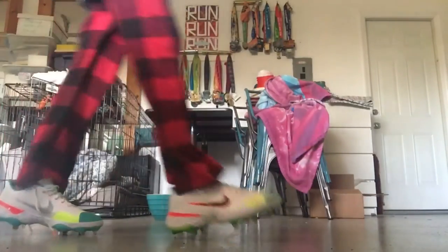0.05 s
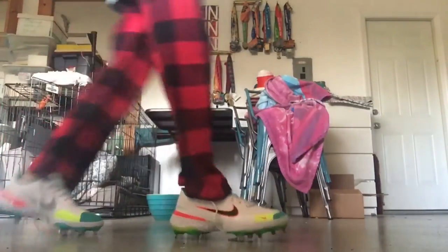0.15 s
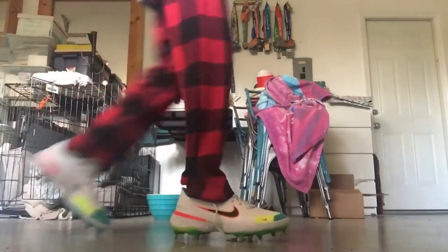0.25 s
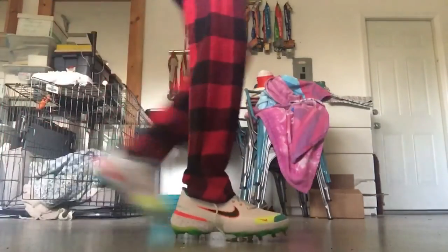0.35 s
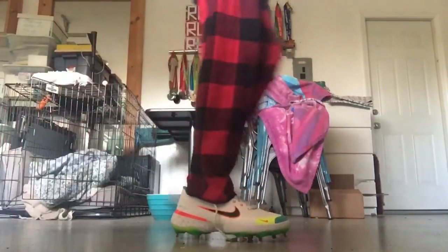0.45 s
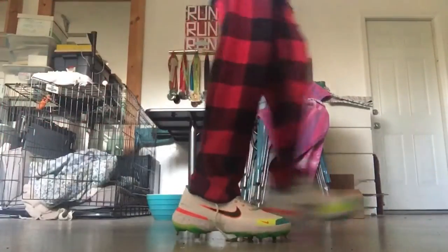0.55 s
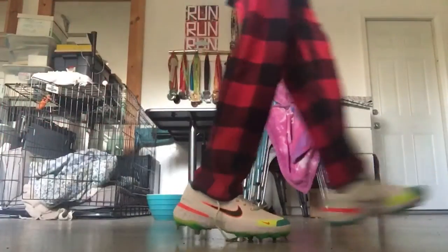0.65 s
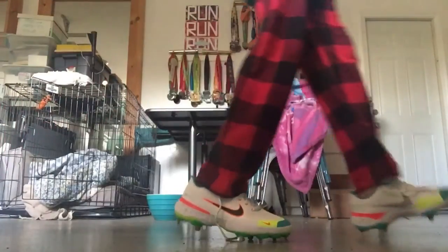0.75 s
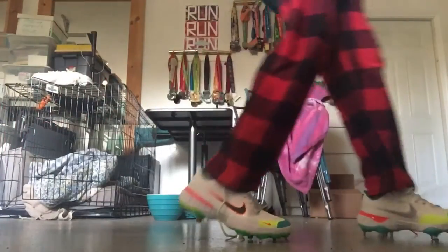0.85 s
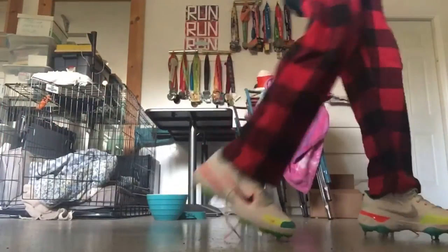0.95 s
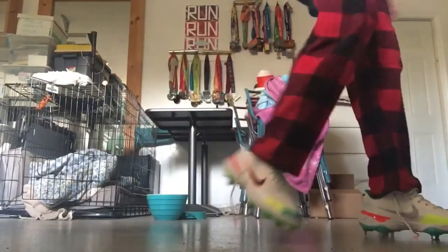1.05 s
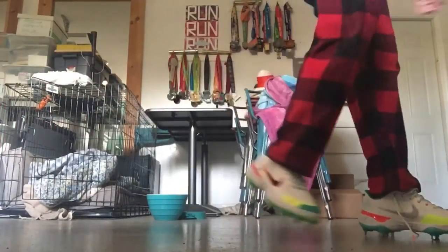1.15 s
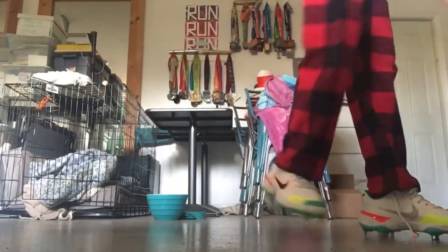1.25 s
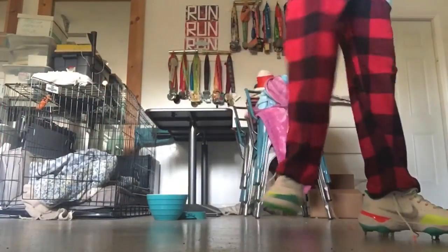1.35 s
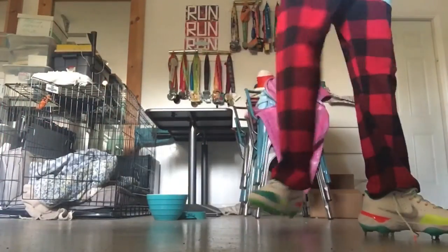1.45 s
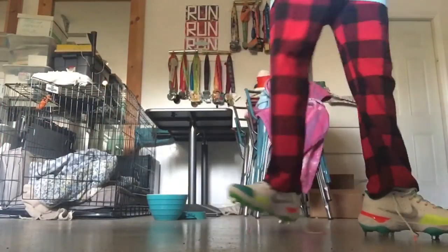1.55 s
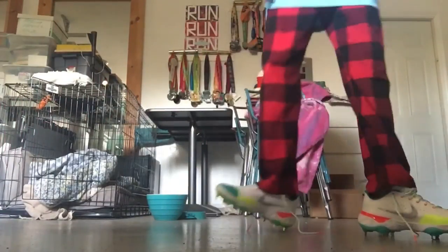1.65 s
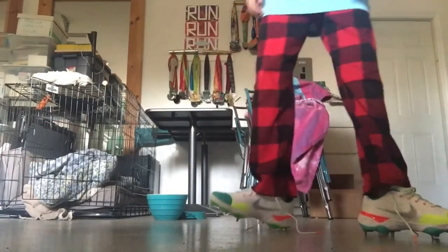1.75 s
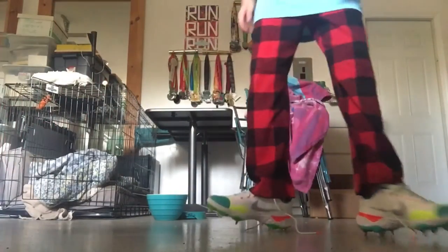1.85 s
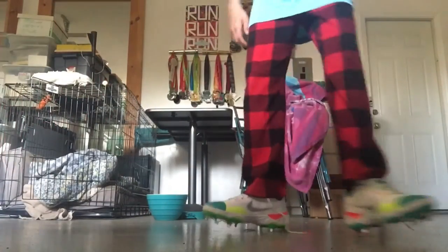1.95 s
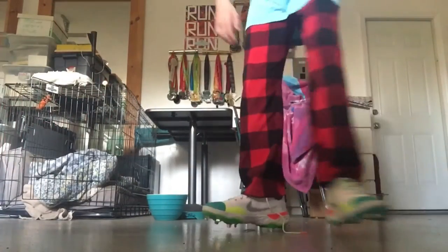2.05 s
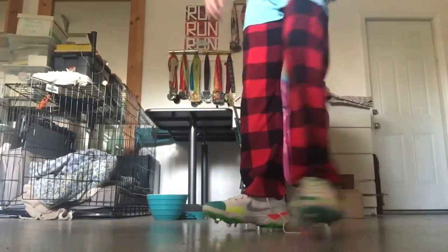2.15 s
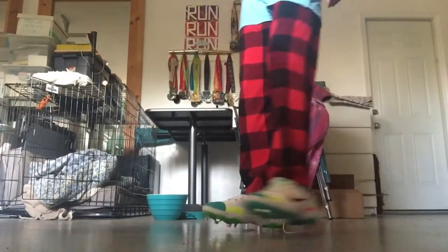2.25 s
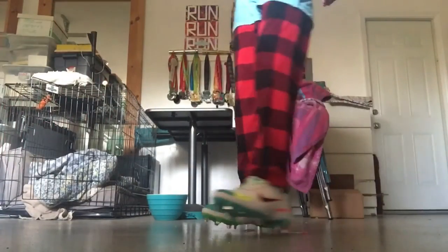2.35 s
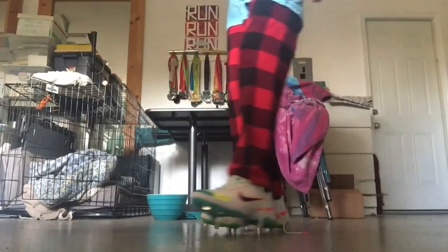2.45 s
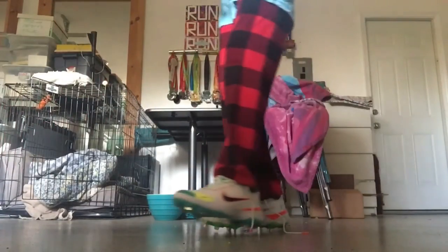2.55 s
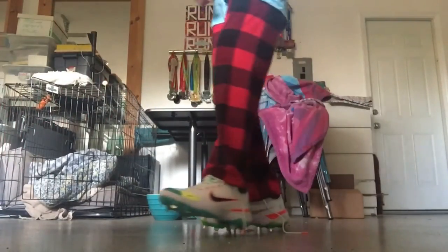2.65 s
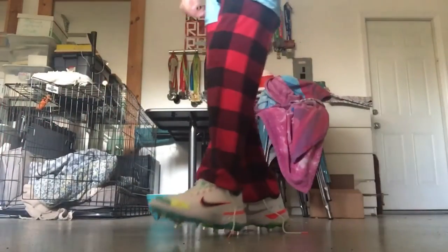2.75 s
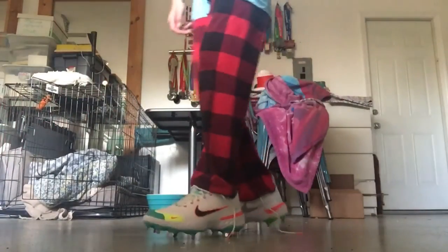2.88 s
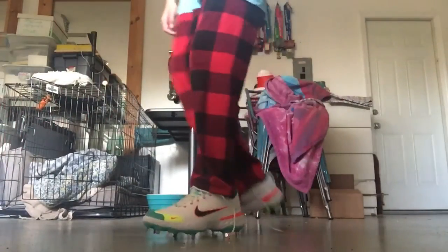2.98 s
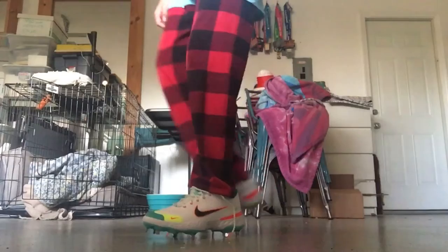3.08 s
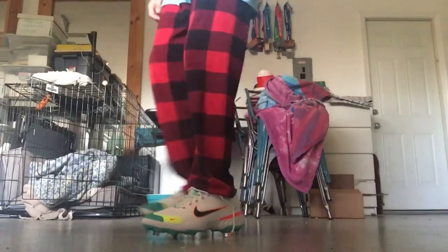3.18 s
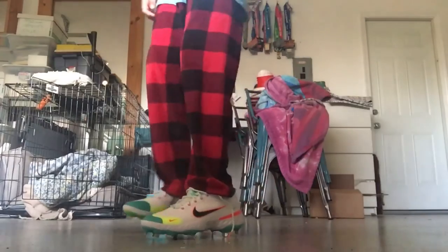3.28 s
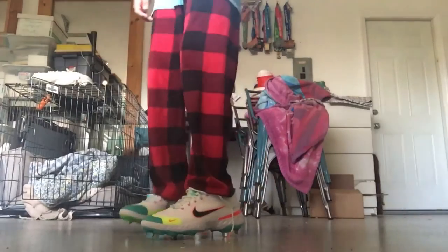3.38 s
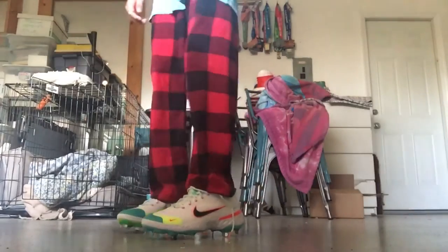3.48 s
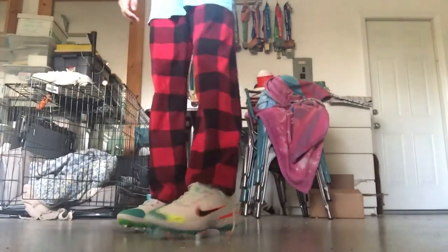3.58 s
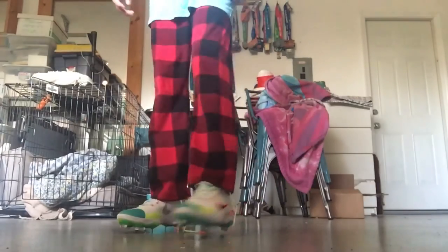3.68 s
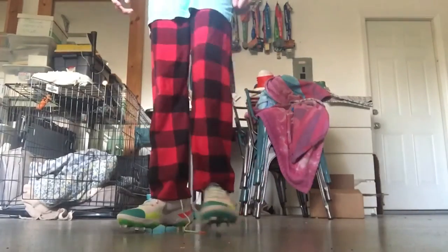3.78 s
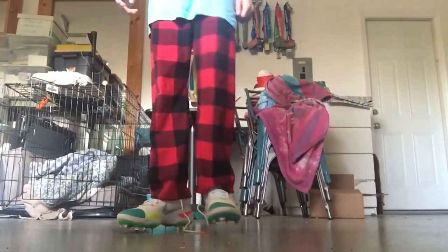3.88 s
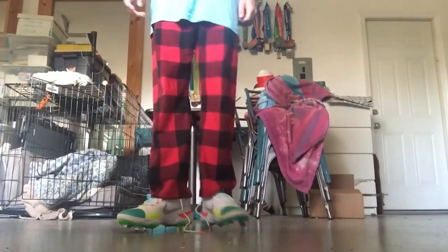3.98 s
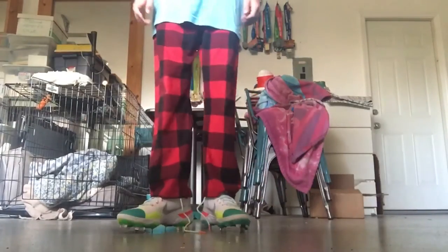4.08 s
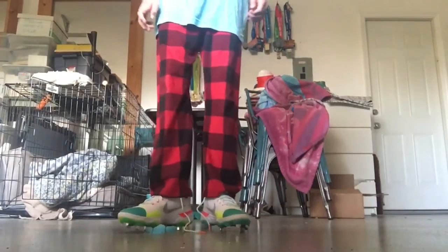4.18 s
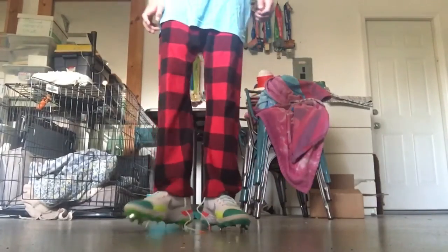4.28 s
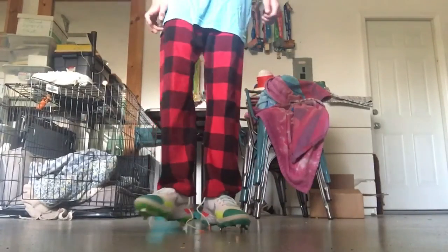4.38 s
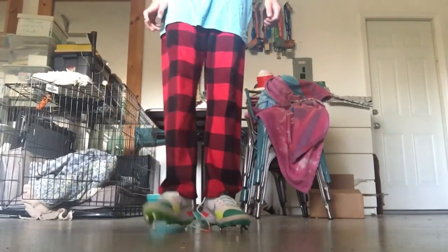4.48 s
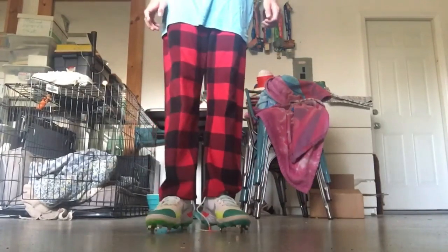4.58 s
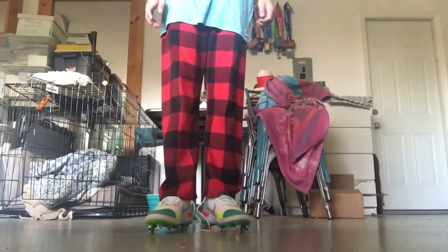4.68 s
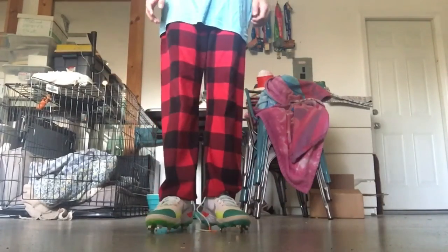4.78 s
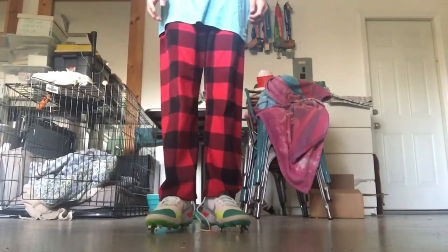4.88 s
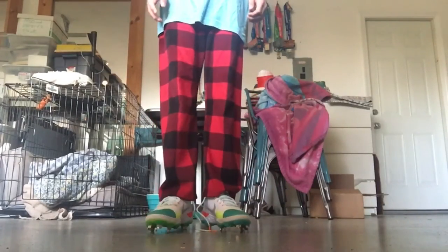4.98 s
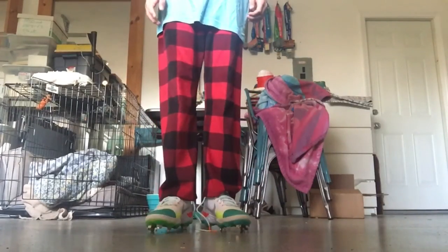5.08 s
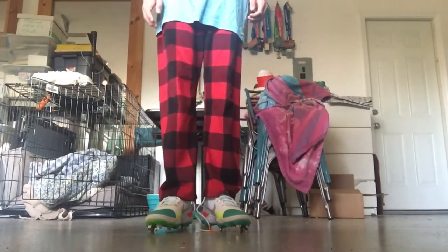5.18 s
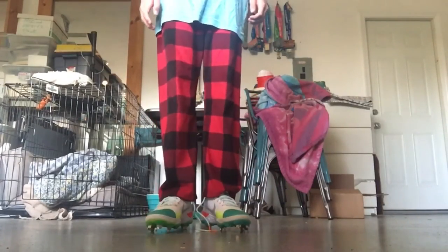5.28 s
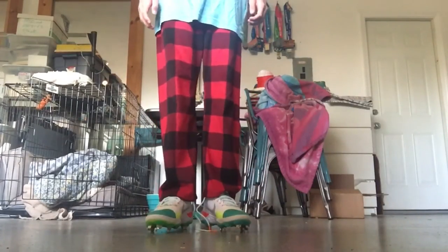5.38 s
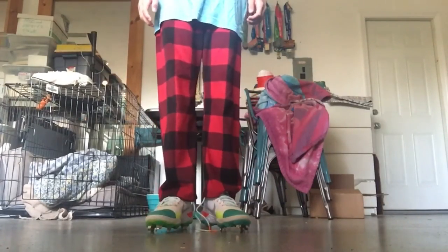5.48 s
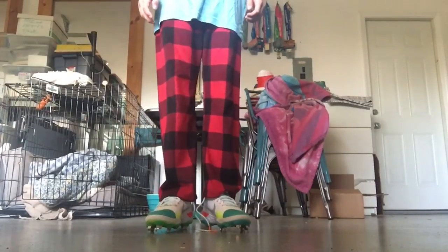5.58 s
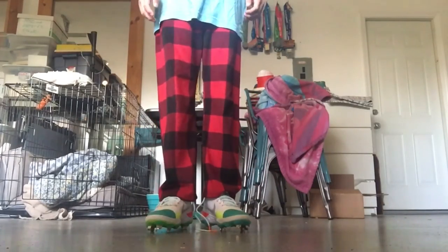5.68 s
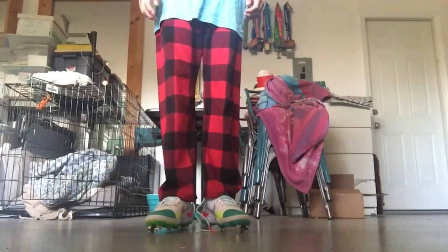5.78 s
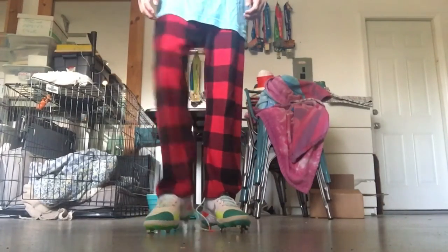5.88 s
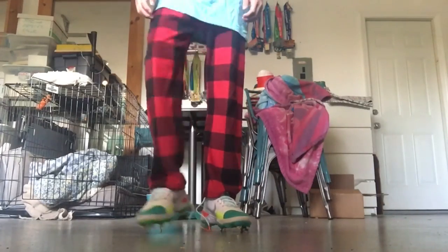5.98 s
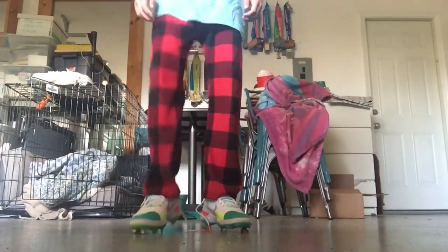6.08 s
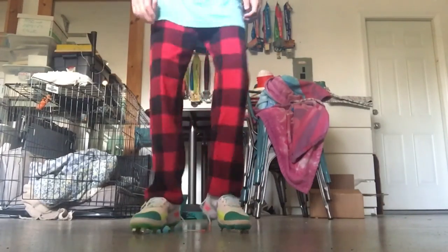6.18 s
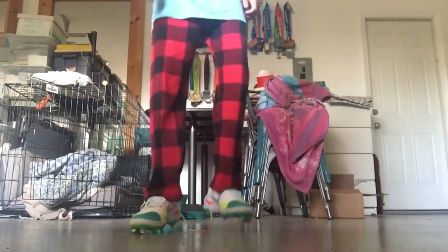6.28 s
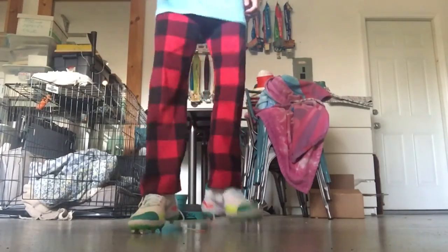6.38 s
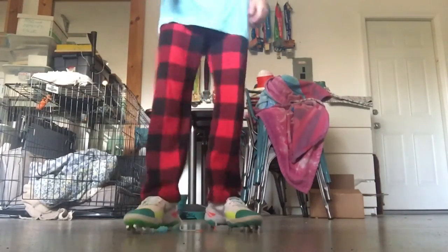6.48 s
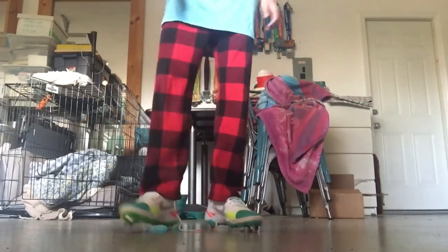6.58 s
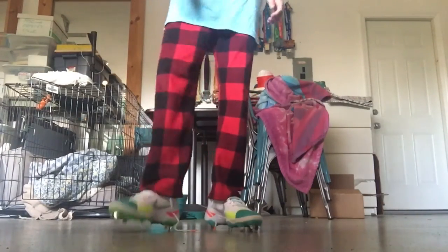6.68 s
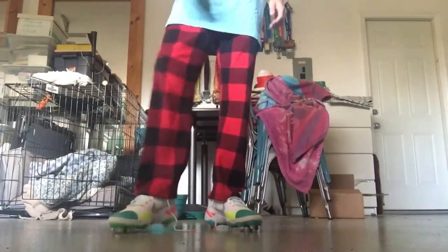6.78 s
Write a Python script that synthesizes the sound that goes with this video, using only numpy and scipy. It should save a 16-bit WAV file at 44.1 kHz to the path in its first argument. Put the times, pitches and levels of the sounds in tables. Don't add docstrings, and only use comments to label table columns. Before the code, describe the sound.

Stiff shoes with metal studs clack unevenly on concrete, several studs often ticking almost together. The wearer walks, turns, then stamps on the spot, with a pause before the last tight flurry of loud clattering hits. A ceiling slap and half-second hard garage ring follow each contact. Trousers swish softly, and a faint low rumble, thin hiss and barely audible high electric whine continue throughout, picked up by a nearby phone.

```python
import sys
import numpy as np
from scipy import signal
from scipy.fft import rfft, irfft, next_fast_len
from scipy.io import wavfile
from scipy.ndimage import map_coordinates

SR = 44100
rng = np.random.default_rng(int(sys.argv[2]) if len(sys.argv) > 2 else 0)


def persist_wave(psi):
    counts = np.round(np.clip(psi, -1, 1) * 32767).astype(np.int16)
    wavfile.write(sys.argv[1], SR, np.atleast_2d(counts).T)


def volts(x):
    e = np.asarray(x, float) / 20
    return 10 ** e


N = 301644
LEAD = SR // 2
TOP_HZ = 15760
BLOW_TIME = np.arange(SR // 10) / SR

# (time [s], force [dB], bite [dB], weight [dB], sole plate pitch [Hz])
WALKING = [(-0.16, -18, -10, -3, 1800), (0.041, -13, -22, -9, 1562), (0.1461, -19, -12, -17, 2420),
           (0.1503, -24.5, -1, -22, 1550), (0.2008, -28.5, -11, 4, 1920), (0.502, -43.5, 5.5, -24, 2100),
           (0.7764, -15, -16.5, -5.5, 1674), (0.842, -19, -12.5, -8.5, 1740),
           (0.8646, -20.5, -9, -32, 2320), (0.8781, -24.5, -10, 4, 1770), (1.672, -16.5, -27, -5.5, 1770),
           (1.7976, -24.5, -24.5, -6.5, 1760), (1.9819, -21.5, -4.5, -5, 2117),
           (2.4631, -20, -8, -0.5, 2070), (2.7341, -24.5, -12, -5, 1720), (2.8594, -23, -23, -6.5, 2350),
           (2.8642, -21.5, -5.5, -44, 1900), (2.948, -31.5, -14, -4, 1810), (3.3213, -44.5, -23, -34, 1550),
           (3.4233, -17, -19, -10.5, 1870), (3.4368, -25, -27, 0, 1855), (3.9899, -18.5, -12, -4, 1750),
           (4.008, -23, -2.5, -19, 2056), (4.043, -22.5, -5.5, -13, 1430)]
# (time [s], force [dB], bite [dB], weight [dB], sole plate pitch [Hz])
STAMPING = [(4.4825, -17, -17.5, -9, 1650), (4.5423, -17.5, -14, -14, 1470), (4.5496, -13.5, -2, 2, 2347),
            (5.8926, -29.5, -23, -8, 1630), (6.086, -20, 5.5, -3.5, 1820), (6.1025, -23, -30, -14, 1450),
            (6.109, -20.5, -44, -10, 2610), (6.1768, -26, -10, -4.5, 1290), (6.4421, -11, -16, -1.5, 1970),
            (6.4541, -18.5, 0.5, -12, 2420), (6.4708, -24, 2, 5, 1780), (6.4716, -15.5, -5, 0, 1630),
            (6.4767, -12.5, -2.5, -32, 1400), (6.4796, -17.5, -1, -10, 2397),
            (6.4846, -22.5, -1, -31, 2210), (6.7503, -13, -3.5, -14, 2124), (6.7532, -19, -24, 3.5, 1310),
            (6.826, -24.5, -11, -31, 2480)]
# (time [s], ring [dB], upper ring [dB])
NEIGHBOUR_STUDS = [(0.1465, -25, -24), (0.8421, -36, -24), (0.8786, -23.5, -48), (1.7974, -55, -35),
                   (1.9826, -16.5, -23.5), (2.8599, -24.5, -29), (3.4234, -45, -25.5), (3.4363, -22, -62),
                   (4.0081, -46.5, -27.5), (4.5499, -17, -16.5), (5.8938, -26.5, -66), (6.0861, -12, -42),
                   (6.1774, -45, -26.5), (6.4538, -40, -20), (6.4717, -15.5, -14.5), (6.4797, -12, -40),
                   (6.7503, -28.5, -16.5)]
# (time [s], tick [dB], ring [dB])
GRAZES = [(0.0265, -54, -78.5), (0.155, -32, -39.5), (0.6114, -80, -43), (0.624, -50, -76),
          (0.641, -59, -79.5), (0.654, -48.5, -60), (0.6768, -92, -50), (0.6949, -52, -59),
          (0.7458, -52, -65), (0.8493, -42.5, -44), (1.028, -42, -61), (1.4783, -58, -78.5),
          (2.5707, -49, -59), (2.589, -58, -74), (2.595, -42, -72), (2.916, -45, -68), (2.93, -47, -60),
          (3.8882, -47, -81.5), (3.9043, -50, -66), (3.92, -64, -85), (6.0947, -38, -22)]
# (time [s], plate [dB], bending [dB], thud
# [dB])
LOAD_SHIFTS = [(0.1567, -46, -59, -35.5), (0.559, -63, -47.5, -37), (0.612, -41, -53.5, -56),
               (0.652, -52, -52, -72), (0.6768, -47, -52, -78), (0.7448, -47.5, -45.5, -44.5),
               (0.894, -26, -49.5, -33.5), (1.3188, -53, -61.5, -62), (2.596, -44.5, -54, -39),
               (2.9057, -44, -69, -32.5), (2.9307, -59, -44.5, -64), (3.566, -53, -56, -38),
               (6.346, -71, -46, -43), (6.532, -24, -50, -38), (0.1505, -58, -38, -55),
               (1.983, -59, -32.5, -58.5), (6.0862, -60.5, -23, -54), (6.4712, -60, -15.5, -32),
               (6.4778, -60, -36, -50)]
# (time [s], room share [dB])
ROOM_SHARE = [(0, -1), (.8, 1), (1.67, 2.5), (1.98, 1), (2.73, 2), (2.86, 0.5), (3.43, 4.5), (4, 4),
              (4.55, 0), (5.89, 2), (6.44, 2.5), (6.48, 1.5), (6.75, 3)]
# (delay [s], level [dB])
FIRST_ECHOES = [
    (0.0114, -16),
    (0.017, -21),
    (0.0161, -23),
    (0.024, -26),
    (.033, -27.5),
]
# (frequency [Hz], time to fall 60 dB [s])
GARAGE_DECAY = [(100, 0.45), (260, 0.67), (700, 0.59), (1840, 0.58), (4850, 0.54), (12800, 0.42)]
# (frequency [Hz], level [dB])
GARAGE_COLOUR = [(100, -9.5), (340, -7), (530, -8.5), (720, -6.5), (1050, -5), (1600, -3), (2600, -1.5),
                 (4000, -4.5), (8000, -7), (12500, -3.5), (15500, -4)]
# (frequency [Hz], level [dB])
STANDING_WAVES = [(122, -28), (172, -28.5), (201, -29), (285, -29.5), (372, -28.5), (474, -31),
                  (705, -29.5)]
# (time [s], level [dB])
DRAG_LEVEL = [
    (0.501, -89),
    (0.513, -51),
    (0.561, -61),
    (.585, -70),
    (.61, -76),
]
# (frequency [Hz], level [dB per Hz])
GRIT_COLOUR = [(800, -3.5), (2000, -6), (3200, -12), (4400, -7.5), (5400, 2.5), (6400, -7), (8000, -12),
               (15000, -5.5)]
# (middle [s], level [dB], length [s])
LEG_SWINGS = [
    (0, -63, 0.57),
    (0.625, -65.5, 0.33),
    (1.33, -75.5, 0.55),
    (1.98, -67, 0.66),
    (2.643, -81, 0.15),
    (3.29, -73.5, 0.31),
    (3.858, -72.5, 0.92),
    (6.279, -72.5, 1.1),
]
# (frequency [Hz], level [dB per Hz])
CLOTH_COLOUR = [(700, -21), (2000, -2.5), (5000, -3), (9000, -3.5), (15000, 1)]
# (frequency [Hz], level [dB per Hz])
AIR_COLOUR = [(20, -48.5), (30, -30.5), (55, -9.5), (100, -6), (160, -13.5), (300, -16.5), (500, -26),
              (1000, -28), (2500, -35), (6000, -40), (12000, -42.5), (15500, -44.5)]
# (frequency [Hz], rms level [dB])
ELECTRIC_WHINE = [(14147, -83)]
# (frequency [Hz], gain [dB])
MICROPHONE = [(30, -42), (80, -2), (160, -3), (300, -2), (8000, 1), (12500, -12), (15600, -15),
              (16400, -21.5), (16900, -66)]


def steps():
    direct, walls, room = np.zeros((3, N + LEAD + 2 * SR))
    paths = [garage(rise=0.01, near_db=-5) for _ in range(int(N / SR * 4) + 3)]
    studs, soles, lone = contacts()
    blows = [(s, *stud(*row, rng.standard_normal(len(BLOW_TIME))), 0) for s, *row in studs]
    blows += [(s, sole(*row, rng.standard_normal(2)), 0, 1) for s, *row in soles]
    blows += [(s, *stud(*row, rng.standard_normal(len(BLOW_TIME))), 2) for s, *row in lone]
    for s, hit, room_db, kind in blows:
        at = round(s * SR) + LEAD
        to_room = volts(room_db + np.interp(s, *np.transpose(ROOM_SHARE)))
        pulse = all_round(hit, octaves=[0.9, 0.6, 0.8][kind])
        path = paths[4 * at // SR - kind]
        wet = signal.fftconvolve(pulse, path)[SR // 200:]
        direct[at:at + len(hit)] += hit
        walls[at:at + len(hit)] += to_room * hit
        room[at:at + len(wet)] += to_room * wet
    return (direct + echoes(walls) + room)[LEAD:LEAD + N]


def contacts():
    studs, soles = [], []
    for table, bend_db, thud_hz in [(WALKING, -9.5, 294), (STAMPING, -11, 341)]:
        for s, force, bite, weight, plate_hz in table:
            ring_hz = 3490 + 34.5 * bite
            ring_db = force + 3 + 0.4 * bite
            upper_db = force - 5.5 + 0.76 * bite
            room_db = -5 - 0.13 * bite
            studs.append((s, ring_hz, ring_db, upper_db, force + bite, room_db))
            soles.append((s, plate_hz, force, force + bend_db, thud_hz, force + weight))
    lone_hz = 3000
    lone = [(s, lone_hz, ring, tick - 16.5, tick, -3.5) for s, tick, ring in GRAZES]
    lone += [(s, lone_hz, ring, upper, upper - 20, -4.5) for s, ring, upper in NEIGHBOUR_STUDS]
    soles += [(s, 1780, plate, bend, 294, thud) for s, plate, bend, thud in LOAD_SHIFTS]
    return studs, soles, lone


def stud(ring_hz, ring_db, upper_db, tick_db, room_db, chance):
    t = BLOW_TIME
    tick = np.diff(chance, prepend=0) * volts(-60 * t / 0.003) * (1 - np.exp(-t / 0.0001))
    tick = tick / np.abs(tick).max()
    ring = damped(t, ring_hz, t60=0.0026, rise=0.0001)
    upper_hz = 4900 * volts(0.5 * chance[-1])
    upper = damped(t - 0.0001, upper_hz, t60=0.0022, rise=0.0001)
    blow = volts(ring_db + 1) * ring + volts(upper_db + 3) * upper
    rebound_s = 0.00087 * volts(chance[-2])
    rebound = 0.84 * np.roll(blow, round(SR * rebound_s))
    return volts(tick_db + 12) * tick + blow + rebound, room_db


def sole(plate_hz, plate_db, bend_db, thud_hz, thud_db, chance):
    t = BLOW_TIME
    plate = -damped(t, plate_hz, t60=0.01, rise=0.00026, fall=0.64)
    bend_hz = 790 * volts(0.5 * chance[0])
    bend = damped(t - 0.0008, bend_hz, t60=0.016, rise=0.0006, fall=0.3)
    thud = -damped(t - 0.0018, 1.205 * thud_hz, t60=0.013, rise=0.0024, fall=0.47)
    thud = thud + 0.17 * damped(t - 0.002, 120 * volts(chance[1]), t60=0.044, rise=0.0023)
    return volts(plate_db) * plate + volts(bend_db + 3.5) * bend + volts(thud_db + 1) * thud


def damped(t, hz, t60, rise, fall=0.):
    t = np.maximum(t, 0)
    turns = hz * (t - fall * t * t / t60)
    fade = volts(-60 * t / t60) * (1 - np.exp(-t / rise)) * (t < 2 * t60)
    x = np.sin(2 * np.pi * turns) * fade
    return x / np.abs(x).max()


def all_round(hit, octaves):
    power = np.abs(rfft(hit)) ** 2
    k = np.arange(1, len(power) + 1)
    low, high = k * 2 ** (-octaves / 2), k * 2 ** (octaves / 2)
    for _ in range(2):
        total = np.cumsum(power)
        power = (np.interp(high, k, total) - np.interp(low, k, total)) / (high - low)
    power = np.abs(power) * (k * SR / len(hit) < TOP_HZ)
    return np.roll(irfft(np.sqrt(power), len(hit)), SR // 200)


def echoes(x):
    path = np.zeros(SR // 20)
    for delay, db in FIRST_ECHOES:
        path[round(delay * SR):][:2] = volts(db) * np.array([0.75, 0.25])
    return signal.fftconvolve(x, path)[:len(x)]


def garage(rise, near_db):
    hz, t, z = signal.stft(rng.standard_normal(SR), SR, nperseg=256)
    fade = volts(-60 * t / along(GARAGE_DECAY, hz)[:, None])
    tail = signal.istft(z * fade, SR, nperseg=256)[1][:SR]
    t = np.arange(SR) / SR
    clumps = map_coordinates(rng.standard_normal(404), [t * 400])
    tail = tail * volts(9.2 * clumps * np.exp(-t / 0.019))
    tail = tail * (volts(near_db) + 1 - np.exp(-np.maximum(t - 0.008, 0) / rise))
    colour = volts(along(GARAGE_COLOUR, np.fft.rfftfreq(SR, 1 / SR)))
    tail = irfft(rfft(tail / np.linalg.norm(tail)) * colour, SR) + standing()
    return tail * np.clip(10 * (1 - t) - 1, 0, 1)


def standing():
    t = np.arange(SR) / SR
    hz, db = np.transpose(STANDING_WAVES)
    size, turn = rng.standard_normal((2, len(hz), 1))
    rings = volts(db[:, None] + 3 * size) * np.sin(2 * np.pi * hz[:, None] * t + 2 * turn)
    fade = volts(-60 * t / 0.31) * (1 - np.exp(-t / 0.0079))
    return rings.sum(0) * fade / np.linalg.norm(fade)


def drag():
    s, db = np.transpose(DRAG_LEVEL)
    grains = rng.standard_normal(N) * volts(2 * wobble(700))
    level = volts(np.interp(np.arange(N) / SR, s, db, left=-120, right=-120))
    scrape = level * coloured(grains, GRIT_COLOUR)
    return scrape + signal.fftconvolve(scrape, garage(rise=0.01, near_db=-9.5))[:N]


def cloth():
    t = np.arange(N) / SR
    swell = sum(volts(db) * np.exp(-(2 * (t - s) / length) ** 2) for s, db, length in LEG_SWINGS)
    return swell * volts(1.5 * wobble(30)) * coloured(rng.standard_normal(N), CLOTH_COLOUR)


def background():
    air = volts(-61.5 + 2.5 * wobble(2)) * coloured(rng.standard_normal(N), AIR_COLOUR)
    t = np.arange(N) / SR
    whine = np.zeros(N)
    for hz, db in ELECTRIC_WHINE:
        whine += volts(db) * np.sqrt(2) * np.sin(2 * np.pi * hz * t + 0.3 * wobble(20))
    return air + whine


def along(points, hz):
    f, v = np.transpose(points)
    return np.interp(np.log(hz + 1), np.log(f + 1), v)


def filtered(x, spectrum, top_hz=SR):
    m = next_fast_len(len(x) + 8192)
    hz = np.fft.rfftfreq(m, 1 / SR)
    return irfft(rfft(x, m) * volts(along(spectrum, hz)) * (hz < top_hz), m)[:len(x)]


def coloured(x, spectrum):
    y = filtered(x, spectrum, TOP_HZ)
    return y / np.sqrt(np.mean(y ** 2))


def wobble(rate):
    return map_coordinates(rng.standard_normal(int(N * rate / SR) + 4), [np.arange(N) * rate / SR])


def scene():
    shoes = filtered(steps() + drag(), MICROPHONE)
    return (shoes + cloth() + background())[None]


def top_cut(x):
    return signal.sosfilt(signal.butter(12, 16810, fs=SR, output="sos"), x)


def record(dry):
    t = np.arange(SR // 40) / SR
    smear = rng.standard_normal(len(t)) * volts(-60 * t / 0.028)
    smear = smear[None] / np.linalg.norm(smear)
    backwards = dry[:, ::-1]
    ahead = signal.fftconvolve(backwards, smear, axes=1)[:, :N][:, ::-1]
    mix = dry + volts(-24) * ahead
    return top_cut(mix)


dry = scene()
out = record(dry)
persist_wave(out)
```